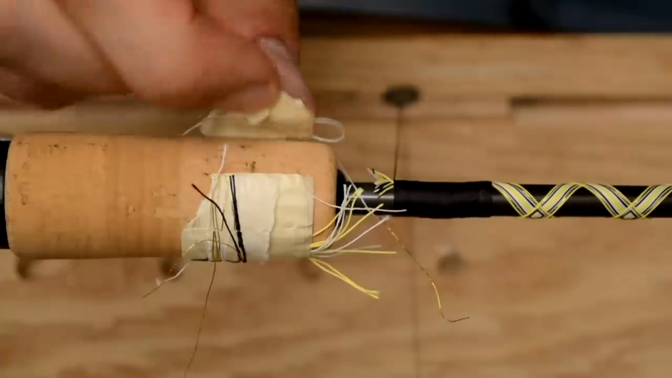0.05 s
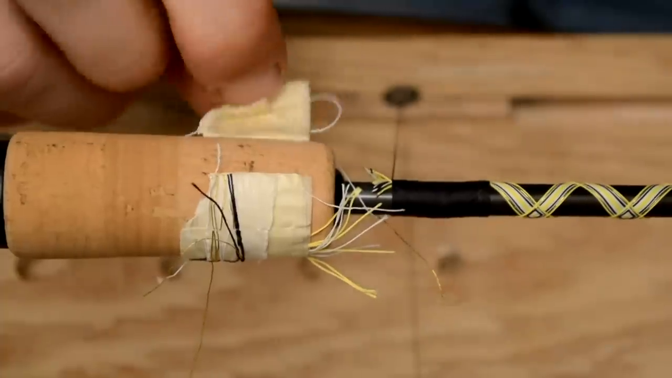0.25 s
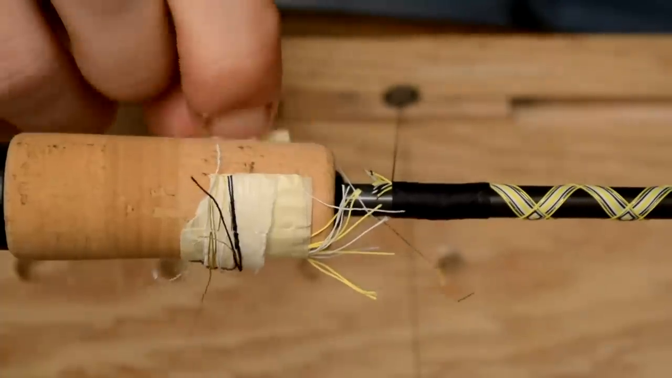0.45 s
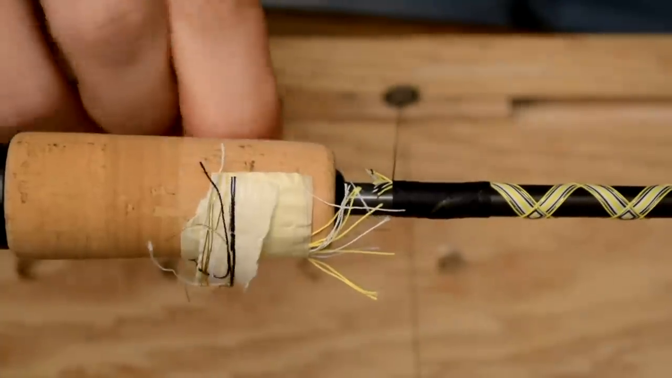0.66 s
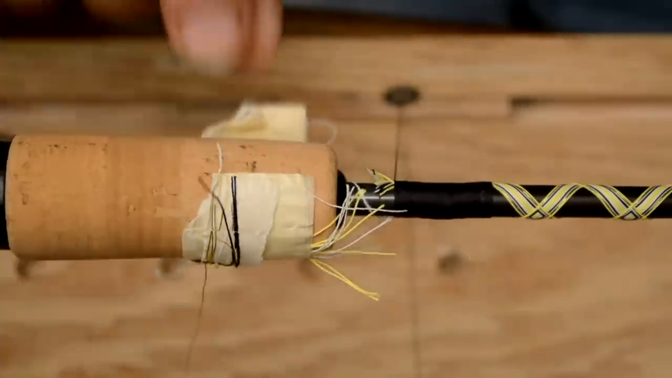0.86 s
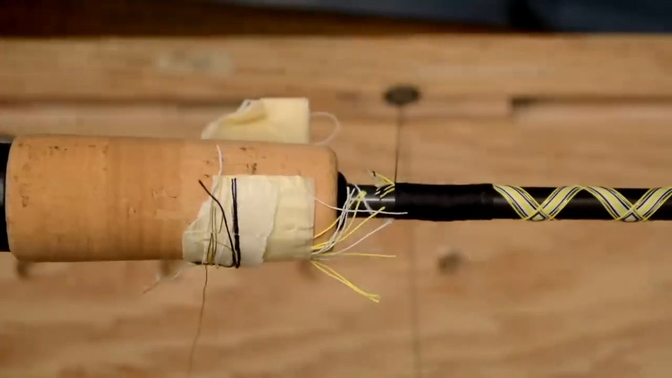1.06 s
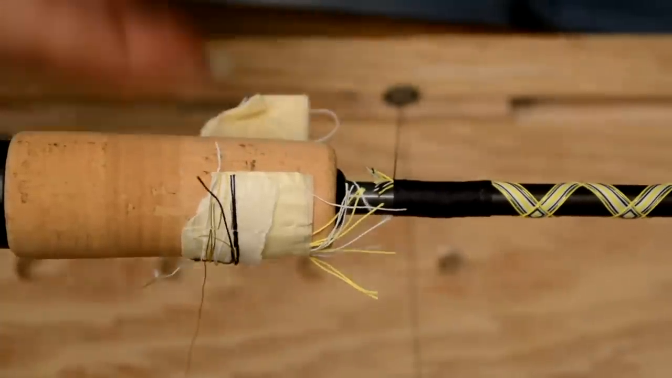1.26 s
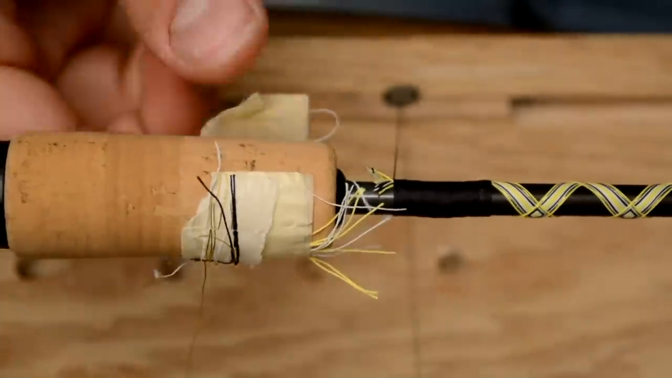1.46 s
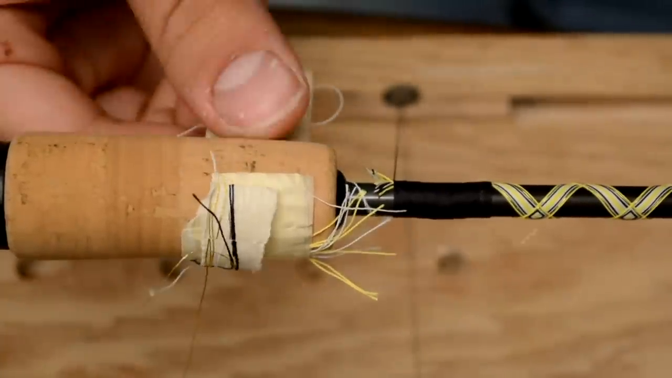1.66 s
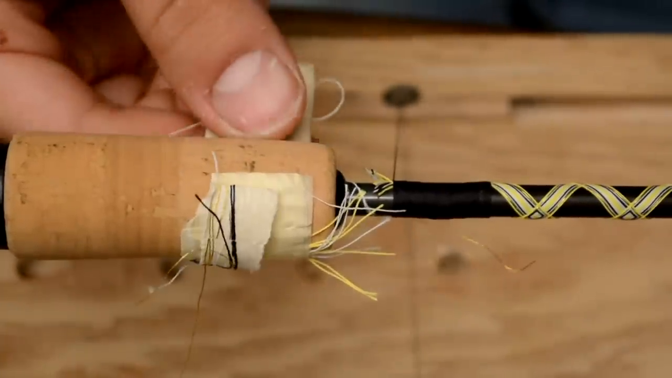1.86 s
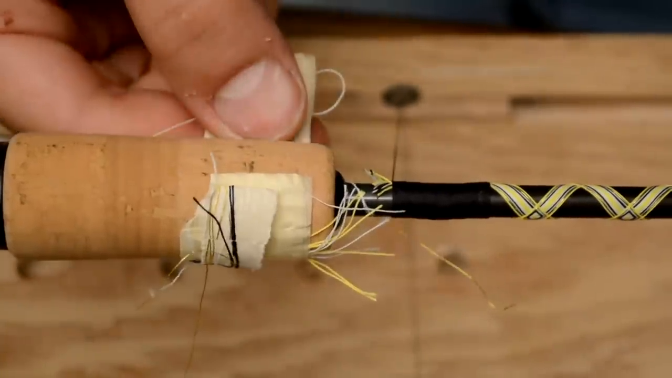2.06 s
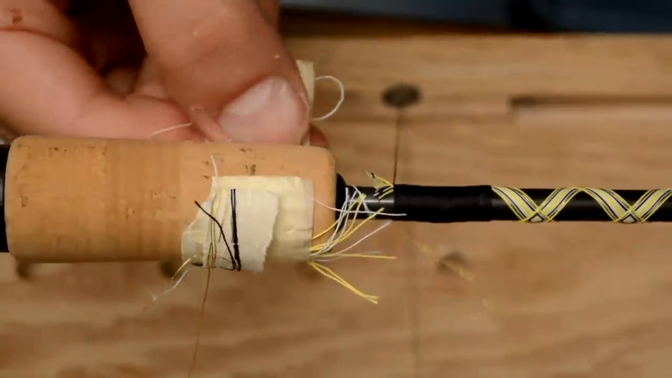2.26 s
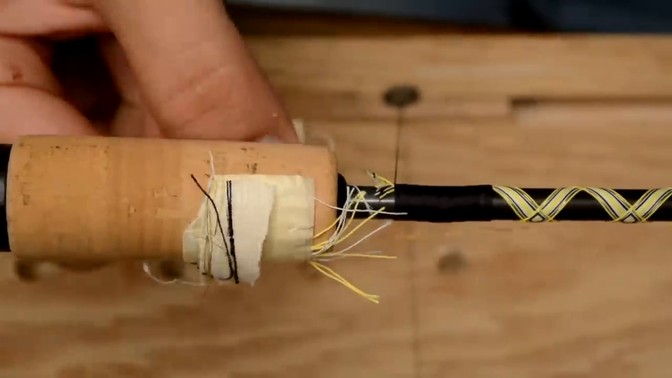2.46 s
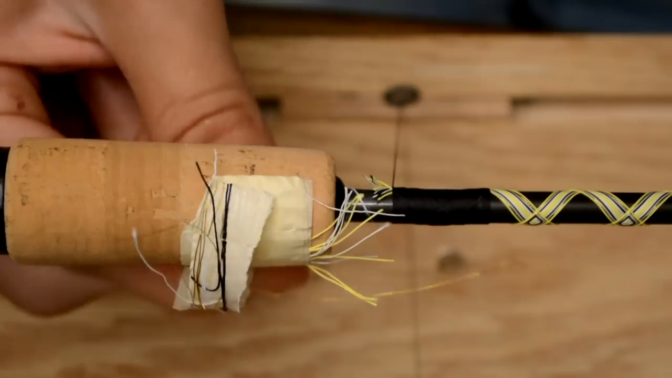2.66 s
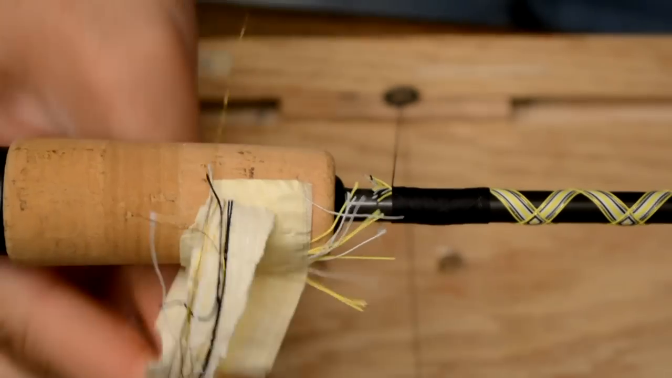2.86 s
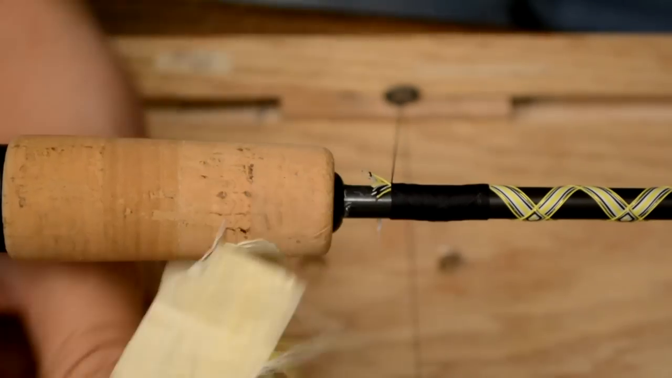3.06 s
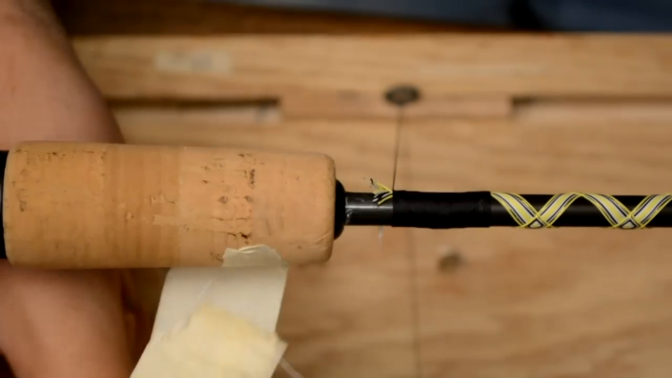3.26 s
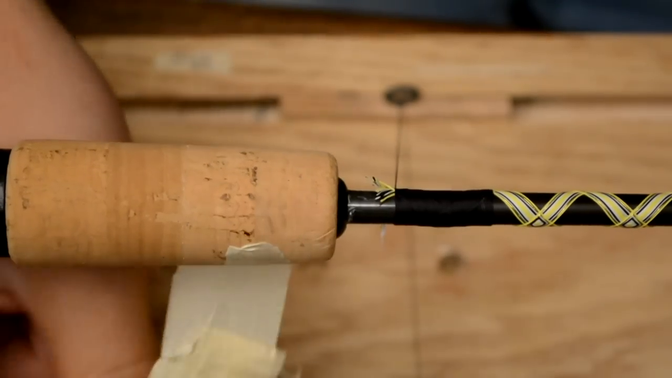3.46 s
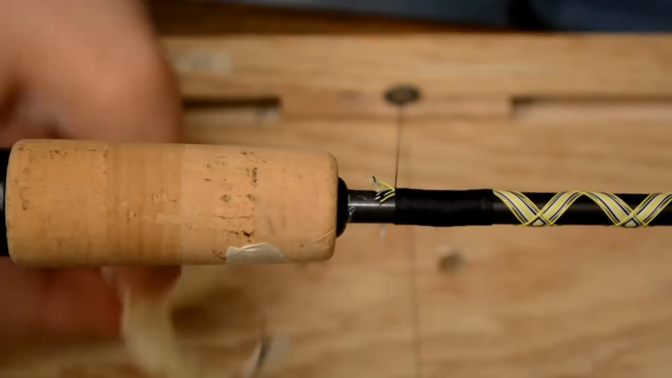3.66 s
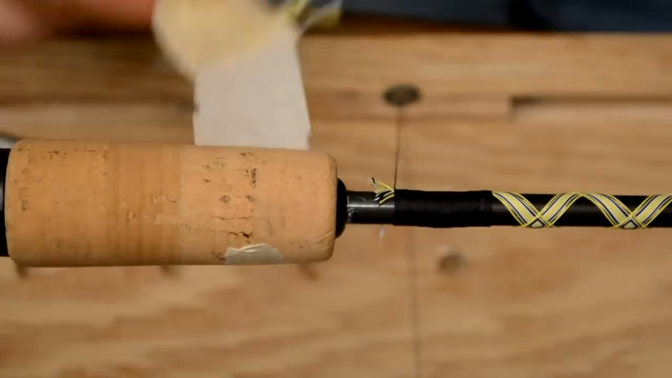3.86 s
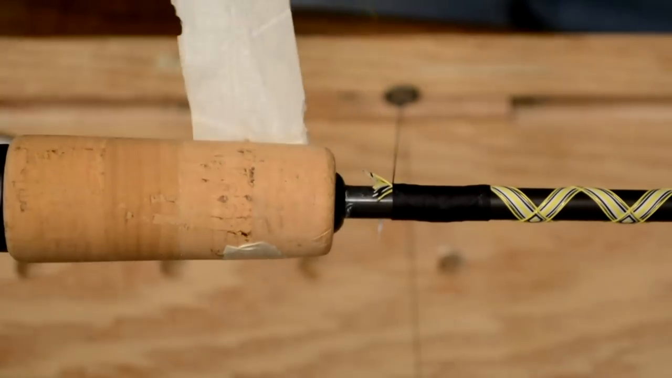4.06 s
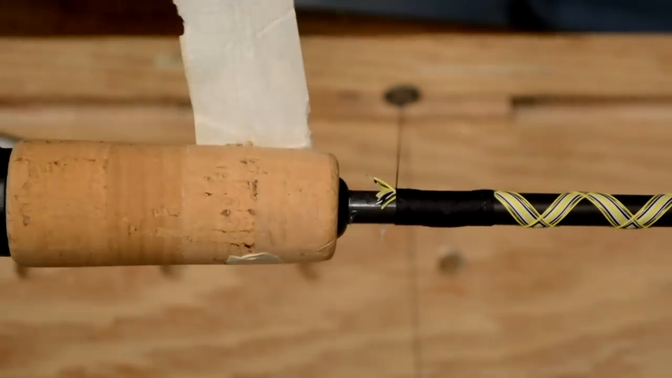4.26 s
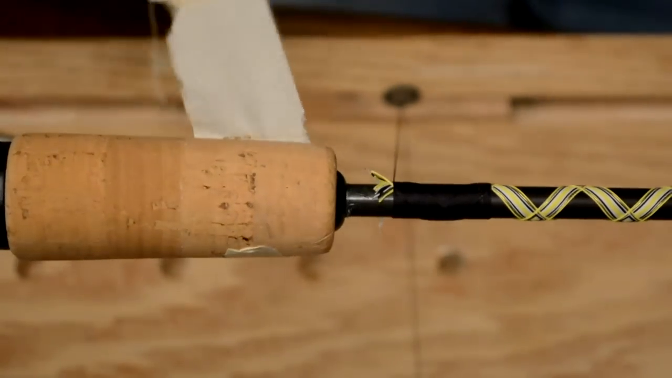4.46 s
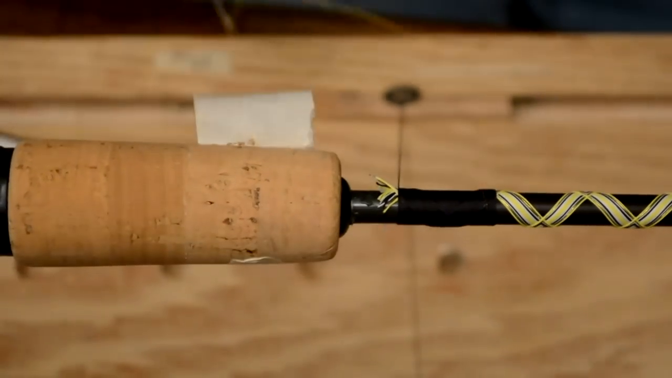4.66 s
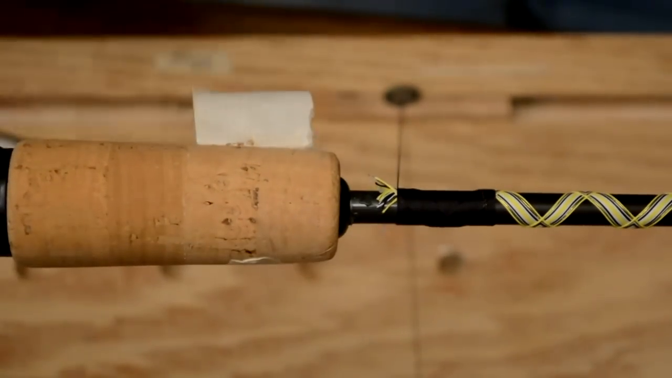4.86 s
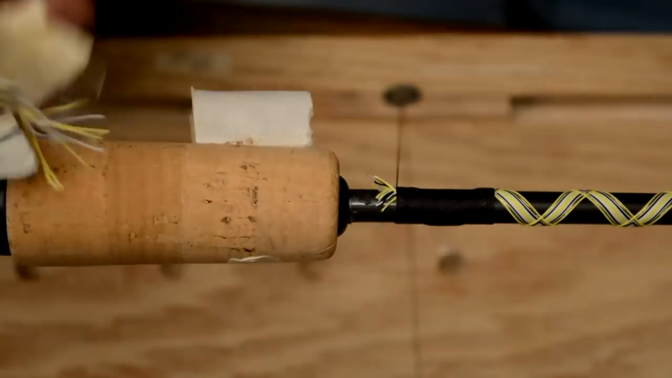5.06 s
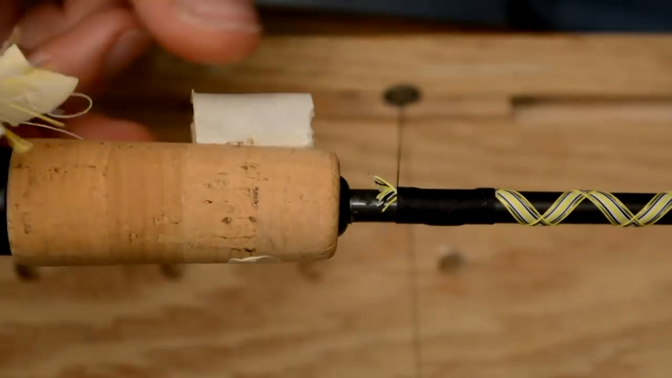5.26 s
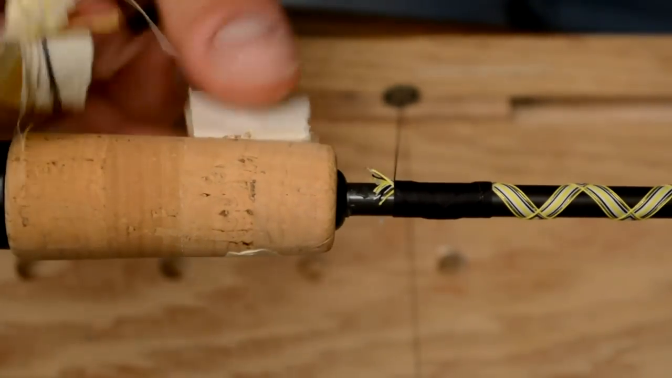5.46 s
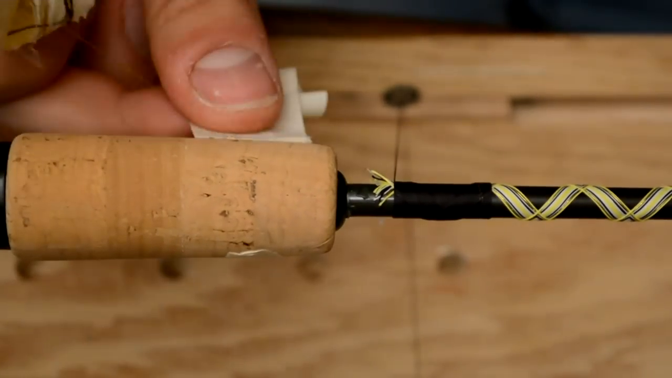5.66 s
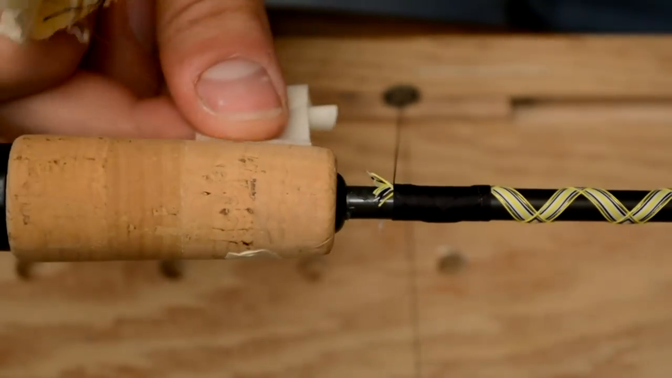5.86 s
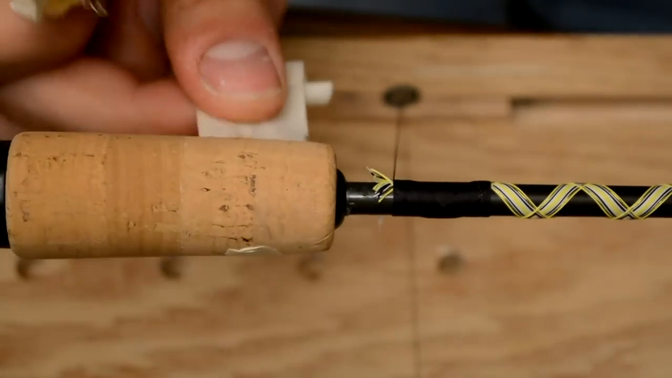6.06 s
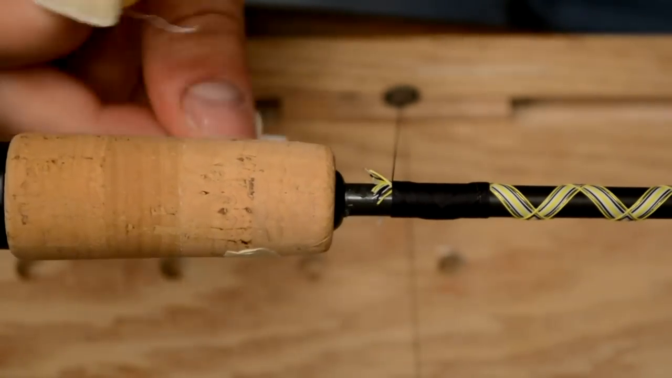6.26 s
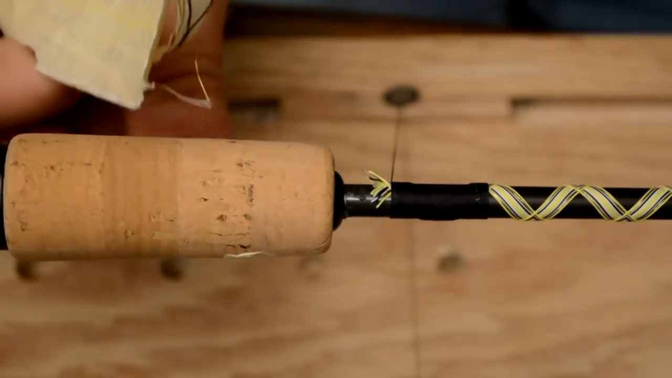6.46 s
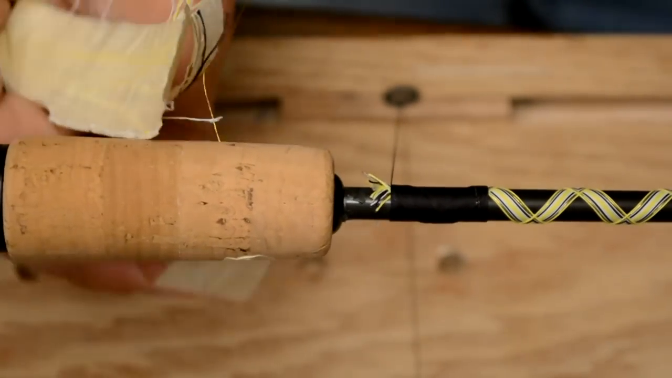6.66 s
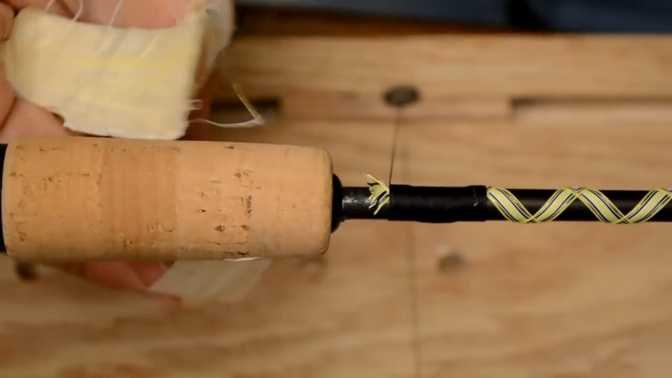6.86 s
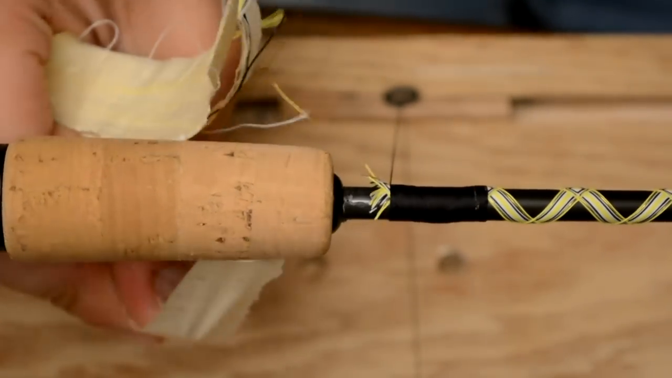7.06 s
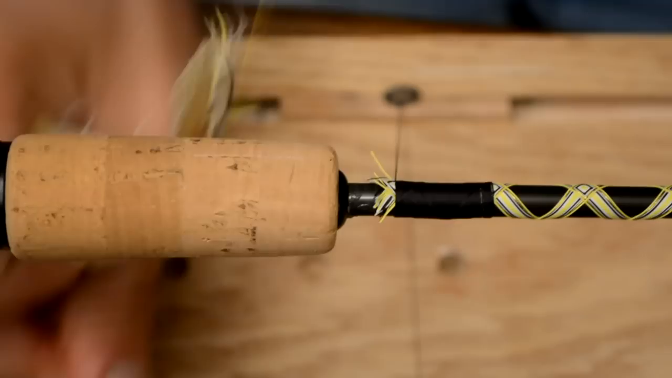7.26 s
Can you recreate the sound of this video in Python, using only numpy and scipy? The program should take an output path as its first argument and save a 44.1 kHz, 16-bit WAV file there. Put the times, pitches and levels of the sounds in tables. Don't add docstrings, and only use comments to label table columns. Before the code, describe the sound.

In a small hard room with a steady soft ventilation hush, a close microphone hears tape being worked off a cork grip on a wooden bench. Faint rustles and a light knock come first, then a crisp, snapping rip at 0.6 seconds. It goes quiet except for small taps and a finger rustle near 1.7. A firm knock and a brief, thinner rip come at 2.4, followed by the loudest crackling rips in bursts from 2.75 to 3.15, with wood knocks among them. Soft rustling and a bump follow at 3.3, another bump at 4.2, then a short, duller rip with the heaviest bench thump around 4.5 to 4.6. Lighter knocks sound at 5.2 and 5.4, sticky ticks cluster around 6.0 to 6.2, and gentle dull paper crinkles continue until a clear papery snap with a small knock at 7.3.

```python
import sys
import numpy as np
from scipy import signal
from scipy.fft import rfft, irfft
from scipy.io import wavfile
from scipy.ndimage import uniform_filter1d

SR = 44100
rng = np.random.default_rng(int(sys.argv[2]) if len(sys.argv) > 2 else 0)


def volts_from_decibels(level):
    exponent = np.asarray(level, float) / 20
    return 10 ** exponent


def waveform_to_disk(signal):
    frames = np.transpose(np.atleast_2d(signal))
    scaled = np.clip(frames, -1, 1) * 32767
    samples = np.round(scaled).astype(np.int16)
    wavfile.write(sys.argv[1], SR, samples)


N = 322524

# (pitch_hz, level_db)
TAPE = [(710, 28), (1200, 29.5), (1310, 19.5), (2620, 16), (2830, -7), (3320, 18), (4960, 16), (7910, 4.5),
        (13900, 2.5), (16000, -1)]
PAPER_HZ = [1500, 2200, 3200, 4500, 6000, 8000, 10500, 13000]
# (pitch_hz, level_db)
MICROPHONE = [(20, -58.5), (60, -19), (110, -12.5), (160, 1), (220, 1.5), (11000, 1), (14000, -3.5),
              (15600, -8), (16100, -48)]


def shape(x, table):
    hz, db = np.transpose(table)
    f = np.maximum(np.arange(len(x) // 2 + 1) * SR / len(x), 1)
    return irfft(rfft(x) * volts_from_decibels(np.interp(np.log(f), np.log(hz), db)), len(x))


def unit(x):
    return x / np.sqrt(np.mean(x ** 2))


def band(x, hz, width_hz):
    centre = min(hz, 0.4 * SR)
    sharpness = hz / min(width_hz, 0.45 * SR)
    return signal.lfilter(*signal.iirpeak(centre, sharpness, SR), x)


def ring(force, modes):
    total = sum(volts_from_decibels(db) for _, db, _ in modes)
    out = 0
    for k, (hz, db, t60) in enumerate(modes):
        pole = np.exp(2j * np.pi * hz / SR - np.log(1000) / (t60 * SR))
        note = signal.lfilter([0, pole.imag], [1, -2 * pole.real, abs(pole) ** 2], force)
        out = out + (-1) ** k * volts_from_decibels(db) / total * note
    return out


def crackle(rate, scatter_db):
    hit = rng.random(N) < rate / SR
    sign = rng.standard_normal(N)
    size = np.minimum(rng.exponential(size=N), 4)
    return unit(hit * sign * volts_from_decibels(scatter_db * size))


def patches(rate, scatter_db, centres_hz):
    return [unit(band(crackle(rate, scatter_db), hz, 0.25 * hz)) for hz in centres_hz]


def snaps():
    # (start_s, peak_db,
    # paper_pitch_hz, bench_jerk_db, length_ms)
    releases = [(0.5832, -19, 3460, -28, 2.5), (0.5842, -16, 8500, -31, 3.4), (0.59, -13, 5800, -20, 0.99),
                (0.5921, -14, 5400, -26.5, 1.3), (0.596, -13, 7800, -21, 3.3), (0.6005, -9, 5300, -29, 1.6),
                (0.6038, -11, 5800, -16, 1.3), (0.6055, -9.5, 6000, -16, 2.6), (0.6104, -11.5, 3500, -16, 1.9),
                (0.6155, -9, 3300, -18, 3.9), (0.6163, -9, 7500, -24, 3), (0.6235, -12, 7500, -20, 2.2),
                (0.6405, -13, 6500, -30, 2.6), (2.3922, -28, 10500, -15, 2.5), (2.3995, -21, 3300, -30, 1.9),
                (2.4, -20, 8000, -27, 1.6), (2.4022, -14.5, 9500, -24.5, 1.3), (2.4078, -13.5, 7200, -18, 4.3),
                (2.409, -16.5, 3800, -19.5, 3.6), (2.4258, -17, 7450, -29, 2.4),
                (2.4282, -14.5, 9300, -29, 1.8), (2.4377, -20.5, 7500, -29, 4),
                (2.4415, -16.5, 7800, -29, 2.2), (2.4412, -18, 3400, -25.5, 1.7),
                (2.4473, -11.5, 9300, -15, 3.6), (2.4482, -18.5, 5000, -24, 2.8), (2.3925, -28, 14800, -30, 3),
                (0.333, -36, 7500, -22, 3), (0.3335, -38, 14000, -30, 3), (0.3667, -40, 8000, -24, 3),
                (0.3672, -41, 14000, -30, 3),
                (2.7459, -16.5, 7800, -13, 0.77), (2.7493, -12.5, 3900, -22.5, 1), (2.7515, -7, 7900, -29, 8),
              (2.7572, -15, 7760, -28, 1.7), (2.7643, -12, 4300, -28, 2.5), (2.7685, -13, 4500, -30, 4),
              (2.7706, -9, 7000, -30, .8), (2.7425, -25, 14500, -30, 4), (2.7797, -6, 5800, -26, 2.5),
              (2.7797, -9, 7900, -30, 2.5), (2.7898, -9, 5700, -30, 3.5), (2.7869, -17, 3200, -16, 2.4),
              (2.7905, -5.5, 3300, -42, 2.3), (2.7946, -16, 2400, -25, 3), (2.798, -10.5, 4560, -20, 3.3),
              (2.9169, -16, 7700, -38, 4), (2.9175, -15, 4600, -30, 3), (2.936, -13.5, 3570, -13, 3.9),
              (2.9483, -10.5, 3400, -27, 1.5), (2.9498, -10, 4500, -22, 3.6), (2.953, -12, 3490, -27, 2.2),
              (2.9588, -34, 3700, -33, 2.5), (2.9849, -20, 1400, -19, 1.2), (2.9896, -2.5, 4400, -26, 4),
                (3.0792, -7, 3300, -30, 4), (3.0795, -12, 4500, -30, 3.5), (3.0795, -15, 1900, -30, 3.5),
            (3.0917, -10, 3600, -25, 2), (3.0962, -13, 2600, -12, 4), (3.0998, -13, 2900, -8, 0.99),
            (3.1026, -23, 6800, -20, 2), (3.1045, -13, 2600, -13, 5.4), (3.1093, -16, 3200, -18, 2.0),
            (3.1129, -16, 5270, -24, 2.3), (3.1151, -18, 2660, -25, 2.8), (3.1228, -14.5, 6460, -16, 8.6),
            (3.1335, -11, 2300, -7.5, 3.4), (3.1373, -19, 6500, -16, 0.85), (3.1459, -16, 6270, -12, 2.1),
            (3.1482, -14.5, 2200, -15.5, 3.8), (3.1574, -19, 2400, -21, 5.3), (4.4964, -24, 7200, -16, 4.3),
            (4.5027, -23.5, 2100, -20, 0.85), (4.5132, -27, 3350, -24, 5), (4.5275, -15, 2100, -24, 4),
            (4.5285, -22, 4400, -30, 3), (4.514, -27, 7300, -30, 3), (4.5648, -21, 7400, -30, 4),
            (4.5404, -24, 7500, -20, 2), (4.5465, -33, 9700, -20, 3.5), (4.558, -29, 5900, -15, 1.2),
            (4.5592, -30, 2000, -17, 2.1), (4.5644, -17, 2100, -17, 5), (4.5686, -19, 2220, -14, 3)]
    # (start_s, peak_db, paper_pitch_hz, bench_jerk_db)
    ticks = [(0.333, -34.5, 11000, -17), (0.3667, -37.5, 11200, -18), (0.494, -45, 5860, -19),
             (0.879, -40, 6800, -26), (2.616, -35.5, 3320, -11), (2.638, -30, 8640, -16),
             (3.556, -44.5, 2130, -14), (4.089, -40.5, 6100, -19), (0.16, -54, 7000, -20),
             (0.312, -44, 7000, -8), (4.461, -46, 6950, -5), (3.352, -36, 10660, -23), (4.23, -44, 2600, 4),
             (7.0582, -41.5, 7000, 0.5), (4.84, -52, 9100, -35), (5.3766, -44.5, 9400, -11),
             (5.5569, -38.5, 3196, -2), (5.638, -37.5, 8300, -27), (5.9876, -34, 3420, -17),
             (6.0258, -30.5, 3350, -6), (6.0363, -25, 3140, -7.5), (6.2135, -28, 2100, -13),
             (6.3721, -45, 2050, -10), (6.4451, -43, 2920, -16), (7.0229, -52, 3300, 12.5),
             (7.0986, -41.5, 4200, -3), (7.253, -41, 3310, -2.5), (7.3033, -14.5, 3120, -18),
             (7.3035, -20, 6500, -25), (7.3045, -25, 9400, -19), (2.742, -18, 7800, -14),
             (2.924, -23, 6500, -22), (3.2853, -29.5, 11000, -38), (3.3021, -26.5, 3770, 2),
             (5.58, -47, 6170, -18), (5.621, -48, 9400, -25), (5.659, -48, 8000, -25),
             (5.9908, -35, 4460, -10), (6.04, -26.5, 2280, -2.5), (6.207, -33, 2300, -23),
             (6.2155, -37, 3300, -20), (2.602, -36, 9500, -22), (2.625, -35, 8000, -20),
             (0.238, -54, 9500, -25), (2.617, -42, 14000, -25), (2.681, -43, 8300, -25),
             (5.992, -35, 2200, -10), (6.36, -47, 5800, -25), (6.374, -47, 6500, -25)]
    # (pitch_hz, level_db)
    strip_notes = [(3300, -0.5), (5700, 1.5), (7600, -1.5), (9600, -3)]
    strip_db, strip_scatter_db = -9.0, 3.0
    tick_ms, tick_strip_db = 3.9, -5.5
    rise_share, hold_share = 0.14, 0.75

    size = 1024
    sound, force = np.zeros(N + size), np.zeros(N + size)
    ms = np.arange(size) / SR * 1000
    rows = [(*row, 0) for row in releases]
    rows += [(*row, tick_ms, tick_strip_db) for row in ticks]
    for s, db, hz, jerk_db, length_ms, broad_db in rows:
        noise = rng.standard_normal(size)
        share = ms / max(length_ms, 0.4)
        swell = np.minimum(share / rise_share, 1) * np.exp(-(share / hold_share) ** 1.9)
        tear = noise * np.sqrt(np.abs(noise)) * swell

        strip = 0
        for (note_hz, note_db), chance in zip(strip_notes, noise[::-1]):
            level = volts_from_decibels(strip_db + note_db + strip_scatter_db * chance)
            strip = strip + level * unit(band(tear, note_hz, 0.23 * note_hz))
        crisp_db = -4.0 - 3.5 * np.log2(hz / 2000)
        crisp = volts_from_decibels(crisp_db) * unit(shape(tear, TAPE) + 0.39 * band(tear, 8000, 6000))
        pitched = unit(band(band(tear, hz, 2.05 * hz), hz, 0.19 * hz))
        paper = pitched + volts_from_decibels(broad_db) * (strip + crisp)

        i = int(s * SR)
        sound[i:i + size] += volts_from_decibels(db - 1.5) * paper / np.abs(paper).max()
        force[i:i + size] += volts_from_decibels(db + jerk_db + 9.5) * tear / np.sqrt(np.sum(tear ** 2))
    return sound[:N], force[:N]


def pulls():
    # (start_s, length_s, crackle_db, change_to_the_end_db, bench_drag_db)
    steady_pulls = [
        (0.586, 0.061, -27, -3.5, 2),
        (2.396, 0.054, -36, 2, 6),
        (2.745, 0.07, -23, -8, 4),
        (2.901, 0.058, -43, 16.5, 4),
        (3, 0.058, -38.5, -19, 16),
        (3.088, 0.095, -23, -12.5, 12),
        (4.496, 0.032, -41, -3, 15),
        (4.53, 0.055, -40, 0, 19),
    ]
    attack_s, release_s = 0.004, 0.004
    strokes_per_s, stroke_db = 140, 4.5

    t, gain, drag = np.arange(N) / SR, 0, 0
    for s, length, db, change_db, drag_db in steady_pulls:
        fade_in = np.clip((t - s) / attack_s + 1, 0, 1)
        fade_out = np.clip((s + length - t) / release_s + 1, 0, 1)
        level = volts_from_decibels(db + change_db * np.clip((t - s) / length, 0, 1))
        pull = (fade_in * fade_out) ** 2 * level
        gain = gain + pull
        drag = drag + volts_from_decibels(drag_db) * pull
    strokes = np.repeat(rng.standard_normal(N // 100), int(SR / strokes_per_s))
    slip = unit(volts_from_decibels(stroke_db * uniform_filter1d(strokes, size=60)[:N]))
    parts = patches(2500, 1.6, PAPER_HZ)
    paper = sum(np.sqrt(hz) * part for hz, part in zip(PAPER_HZ[1:], parts[1:]))
    sound = volts_from_decibels(-4.0) * gain * slip * unit(shape(paper, TAPE))
    force = volts_from_decibels(-22.0) * drag * slip * crackle(6000, 2.2)
    return sound, force


def rustles():
    # (peak_s, level_db, rise_s, fall_s, dull_share_db)
    touches = [(0.2, -58, 0.037, 0.17, -10), (0.33, -52, 0.065, 0.2, -8), (0.49, -55, 0.07, 0.1, -10),
               (0.579, -41.5, 0.24, 0.0092, -18), (1.572, -56, 0.035, .13, -2),
               (1.752, -47.5, 0.086, 0.032, -8), (2.386, -37.5, 0.051, 0.013, -5),
               (2.63, -43.5, 0.51, 0.18, -8), (2.736, -37, 0.081, 0.012, -17), (3.3, -45, 0.18, 0.25, 9.5),
               (3.57, -59, 0.25, 0.055, -9), (3.97, -58.5, 0.032, 0.26, 7), (4.12, -55, .3, 0.28, -4),
               (4.485, -51, 0.25, .01, 1), (5.384, -64, 0.061, 0.076, -9.5), (5.644, -60.5, 0.78, 0.078, 0),
               (6.032, -51, 0.18, 0.53, 9.5), (6.21, -60, 0.086, 0.11, -11), (6.29, -65, .05, 0.064, -8),
               (6.605, -56, 0.036, 0.11, 1), (7.095, -47.5, .04, 0.078, 6), (6.45, -48.5, 0.16, 0.12, 3),
               (6.754, -47.5, 0.14, 0.14, 5), (7.03, -43.5, 0.079, 0.097, 2.5),
               (7.298, -47.5, 0.17, 0.056, 2.5)]
    edge_db, loose_hz = -31.5, 7900

    t, gain, dull = np.arange(N) / SR, np.zeros(N), np.zeros(N)
    for s, db, rise, fall, dull_db in touches:
        on = slice(max(int((s - 0.7) * SR), 0), int((s + 0.9) * SR))
        away = np.maximum((s - t[on]) / max(rise, 0.003), (t[on] - s) / max(fall, 0.003))
        gain[on] += volts_from_decibels(db + edge_db * away)
        dull[on] += volts_from_decibels(db + dull_db + edge_db * away)
    parts = patches(2500, 1.5, PAPER_HZ)
    bright = 0
    for hz, part in zip(PAPER_HZ[3:], parts[3:]):
        weight = 0.16 + np.exp(-(np.log(hz / loose_hz) / 1.1) ** 2)
        bright = bright + weight * part
    return volts_from_decibels(-15.5) * (gain * bright + dull * sum(parts[:3]))


def folds():
    # (start_s, level_db, pitch_hz, width_hz, fade_by_60_db_s)
    noise_rings = [(2.601, -54, 8800, 600, 0.29), (2.801, -31, 5600, 400, 0.33), (3.29, -59, 10900, 2300, 0.87),
                   (5.64, -64, 10600, 2780, 0.29), (2.41, -39, 1350, 400, 0.4), (6.21, -60.5, 5850, 220, 0.61),
                   (6.215, -47, 2190, 600, 0.2), (6.252, -58, 9400, 3800, 0.27),
                   (6.421, -58, 10000, 1646, 0.33), (7.254, -52, 1500, 500, 0.17),
                   (7.286, -46, 1100, 300, 0.36), (7.298, -23.5, 1150, 190, 0.11), (0.6, -31, 1000, 130, 0.26),
                   (6.03, -46.5, 3400, 700, 0.18), (0.6, -32, 580, 150, .3), (2.39, -37, 13500, 3000, .3),
                   (2.751, -19, 7900, 500, 0.054), (3.155, -20, 2450, 250, .04), (4.593, -19, 1950, 500, .04),
                   (6.03, -43, 560, 180, .3), (5.43, -48.5, 360, 120, 0.26), (4.6, -40.5, 3400, 1000, .35),
                   (4.222, -41, 2550, 230, .05), (0.6, -36.5, 170, 60, 0.28), (4.495, -32, 650, 200, .12),
                   (4.571, -20, 1000, 200, .05), (4.577, -23, 2550, 250, .04), (4.61, -29, 1750, 200, .25),
                   (4.621, -21, 850, 250, .04), (4.6, -26, 660, 150, .35), (4.593, -14, 800, 250, .05),
                   (4.593, -27, 3900, 400, .03), (0.601, -24, 1060, 150, .1), (0.598, -32, 2100, 200, .15),
                   (3.124, -24, 980, 200, .05), (3.144, -24, 1100, 250, .05), (2.987, -19, 2000, 250, .04),
                   (6.44, -54, 1400, 200, .3), (6.425, -58, 5100, 250, .2), (2.747, -22, 1130, 200, .12)]
    size = SR // 2
    t, out = np.arange(size) / SR, np.zeros(N + SR)
    for s, db, hz, width_hz, t60 in noise_rings:
        fade = np.clip(t / 0.006, 0, 1) * volts_from_decibels(db - 60 * t / t60)
        i = int(s * SR)
        out[i:i + size] += fade * unit(band(rng.standard_normal(size), hz, max(width_hz, 150)))
    return out[:N]


def bench(jerks):
    # (start_s, peak_db, hardness_db, lower_board_note_db, upper_board_note_db)
    bumps = [(0.154, -36, -23, -14, -7), (0.297, -25.5, -3.5, -24, -7.5), (1.259, -39, -5, -31, -4.5),
             (1.822, -34, -5, -31, -4.5), (2.11, -38, -18, -31, -7), (2.371, -12, -7.5, -22, -16),
             (2.38, -29, -1.5, -31, -12), (2.987, -12.5, 3.5, -9.5, -10.5), (3.002, -13.5, -15, -13, -11.5),
             (3.288, -15.5, -3.5, -4.5, -10), (3.85, -35, -11, -5, -10.5), (4.218, -17.5, -5.5, -5, -12.5),
             (4.574, -15, -3, -13, -9.5), (4.5954, 2.5, -1.5, -13, -18), (5.23, -22, -6, -5, -13),
             (5.425, -19.5, -5.5, -17, -9), (5.997, -33.5, -9, -42, -23), (6.038, -30, -17, -18, -29),
             (6.089, -25.5, -14, -27, -11), (6.774, -33.5, -7, -30, -6), (7.301, -26, 0, -15, -9)]
    # (start_s, level_db)
    thuds = [
        (0.3, -37),
        (0.592, -31.5),
        (0.606, -26),
        (0.621, -25.5),
        (2.41, -34),
        (2.79, -32.5),
        (3.101, -36),
        (4.225, -44),
        (5.429, -43),
        (6.221, -46),
    ]
    # (pitch_hz, level_db, fade_by_60_db_s)
    mid_modes = [(563.5, -2, 0.034), (666.5, -9.5, 0.064), (801.9, -2.5, 0.085), (871, 6.5, 0.013),
                 (1010, -5, 0.066), (1116, -8, 0.05), (1415, -5, 0.032), (630, 11.5, 0.0031)]
    high_modes = [(1596, -1, .012), (1810, 2.5, 0.013), (2077, 1.5, .012), (2460, -0.5, 0.0098),
                  (2836, -1, 0.0069), (3424, 0, .006), (3870, -1, 0.0043), (5200, -10, 0.0025)]
    low_modes = [(159, -8.5, 0.23), (220, 2.5, 0.11), (327, 2, 0.013), (390.4, -3.5, 0.11)]
    # (pitch_hz, level_db, fade_by_60_db_s)
    leg_modes = [(52, 4, 0.65), (72, -2.3, 0.23)]
    # (pitch_hz, level_db, fade_by_60_db_s)
    board_low = [(454.7, -0.5, .15), (489.5, -2.5, 0.086), (661.7, -4, 0.19)]
    board_high = [(878.4, -1.5, 0.105), (795.6, -5.5, 0.079), (1023, -5, 0.043)]

    size = 512
    forces, t = np.zeros((7, N + size)), np.arange(size) / SR
    contacts = rng.standard_normal((len(bumps), size)) * np.exp(-t / 0.005)
    contacts *= rng.random((len(bumps), size)) < 0.15
    contacts[:, 0] = 3
    contacts = uniform_filter1d(contacts, size=5, origin=2)
    for (s, db, hard_db, lower_db, upper_db), chatter in zip(bumps, contacts):
        weight_db = -35.5 - 0.74 * lower_db
        chatter = chatter / np.sqrt(5 * np.sum(chatter ** 2))
        i = int(s * SR)
        forces[:2, i:i + size] += np.outer(volts_from_decibels(db + np.array([4.0, hard_db + 6.0])), chatter)
        single_db = np.array([weight_db + 2.0, lower_db - 6.0, upper_db + 4.5, 4.0, hard_db + 10.5])
        forces[2:, i] += volts_from_decibels(db + single_db)
    drops = np.zeros(N)
    for s, db in thuds:
        drops[int(s * SR)] = volts_from_decibels(db)
    mid, high, low, lower, upper, blow, hard_blow = forces[:, :N]

    def blur(modes):
        return [(hz, db, 0.45 * t60) for hz, db, t60 in modes]

    knock = ring(mid + jerks, mid_modes) + ring(high + volts_from_decibels(-4.5) * jerks, high_modes)
    soft_hard_blow = uniform_filter1d(hard_blow, size=5, origin=2)
    spread = ring(blow + jerks, blur(mid_modes))
    spread = spread + ring(soft_hard_blow + volts_from_decibels(-3.0) * jerks, blur(high_modes))
    no_bass = signal.butter(2, 250, "high", fs=SR, output="sos")
    knock, spread = signal.sosfilt(no_bass, [knock, volts_from_decibels(9.5) * spread])
    thud = ring(low + drops + volts_from_decibels(-20.0) * jerks, low_modes)
    thud = thud + volts_from_decibels(-6) * ring(low + volts_from_decibels(-30.0) * jerks, leg_modes)
    notes = ring(lower + volts_from_decibels(-24.0) * jerks, board_low) + ring(upper + volts_from_decibels(-14.0) * jerks, board_high)
    return knock + thud, shape(spread - knock, MICROPHONE), notes


def room(x, wet_db=-7.0):
    # (pitch_hz, fade_by_60_db_s)
    room_t60 = [(150, 0.44), (400, 0.55), (1000, 0.46), (3000, 0.46), (7000, 0.29), (14000, 0.31)]
    # (pitch_hz, side_minus_mid_db)
    room_wide = [(60, -13), (110, -46), (200, -101), (380, -34), (700, -49), (1290, -60), (2380, -25),
                 (4400, -18), (8120, -2.5), (15000, -9)]
    t = np.arange(SR * 3 // 4) / SR
    hz, t60 = np.transpose(room_t60)
    tails = np.zeros((2, len(t)))
    for centre in 125 * 2 ** np.arange(0, 7.1, 0.5):
        decay = volts_from_decibels(-60 * t / np.interp(np.log(centre), np.log(hz), t60))
        noises = [unit(band(rng.standard_normal(len(t)), centre, centre / 3)) for _ in range(2)]
        tails += np.sqrt(centre) * decay * noises
    tails *= np.clip((t - 0.004) / 0.005, 0, 1)
    tails *= volts_from_decibels(wet_db) / np.sqrt(np.sum(tails[0] ** 2))
    mid, side = (signal.fftconvolve(x, tail)[:N] for tail in tails)
    return mid, shape(side, room_wide)


def hush():
    # (pitch_hz, level_db)
    hush_colour = [(15, -56), (25, -22.5), (123, -5), (200, -6), (249, -2), (317, -4), (405, -3.5),
                   (489, -5), (545, -2.5), (887, -2), (1480, -5), (2050, -7), (3080, -10.5), (11000, -26.5),
                   (16000, -36.5)]
    # (pitch_hz, side_minus_mid_db)
    hush_wide = [(60, -15), (110, -11), (200, -9), (380, -3), (700, -3), (1290, -2), (2380, -1.5),
                 (4400, -1), (8120, -0.5), (15000, -0.5)]
    # (pitch_hz, level_db)
    hums = [(1460, -78), (10900, -94)]
    mid, side = (volts_from_decibels(-56) * unit(shape(rng.standard_normal(N), hush_colour)) for _ in range(2))
    lines = sum(volts_from_decibels(db) * band(rng.standard_normal(N), hz, 19.0) * 60 for hz, db in hums)
    return mid + lines, shape(side, hush_wide)


def scene():
    # (pitch_hz, side_minus_mid_db)
    near_wide = [(60, -38), (110, -34.5), (200, -82), (380, -48), (700, -71), (1290, -50), (2380, -41),
                 (4400, -24), (8120, -14), (15000, -9.5)]
    snap, jerk = snaps()
    creep, drag = pulls()
    knock, blur, notes = bench(jerk + drag)
    near = shape(snap + creep + rustles() + folds() + knock + notes, MICROPHONE)
    near_side = shape(np.roll(near, 9), near_wide)
    echo, echo_side = room(near + blur - 0.5 * notes)
    air, air_side = hush()
    mid = near + echo + air
    side = near_side + echo_side + air_side
    return np.array([mid + side, mid - side])


def band_limit(x):
    return signal.sosfilt(signal.butter(12, 16640, fs=SR, output="sos"), x)


def record(dry):
    rounded = np.tanh(1.2 * dry) / 1.2
    top_cut = signal.ellip(8, 0.2, 60, 15900, fs=SR, output="sos")
    return band_limit(signal.sosfilt(top_cut, rounded))


dry = scene()
out = record(dry)
waveform_to_disk(out)
```